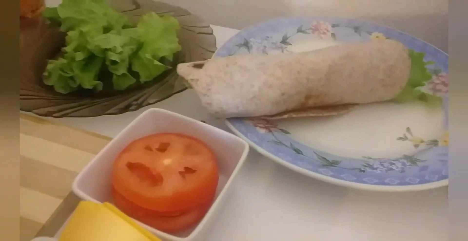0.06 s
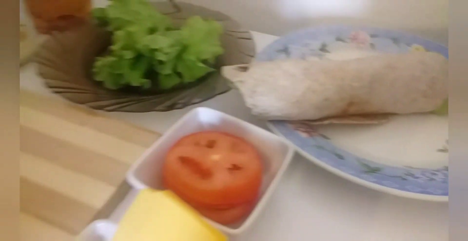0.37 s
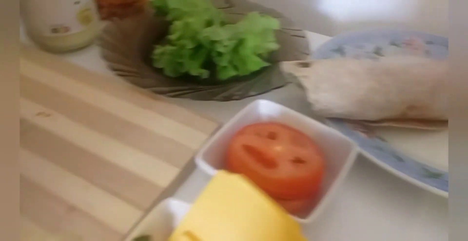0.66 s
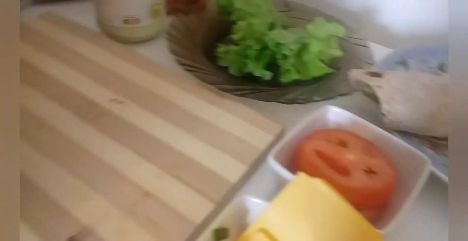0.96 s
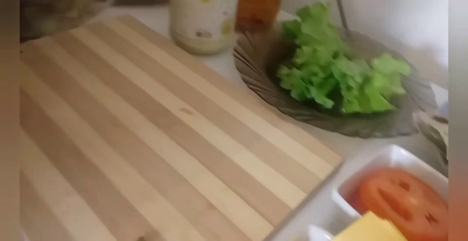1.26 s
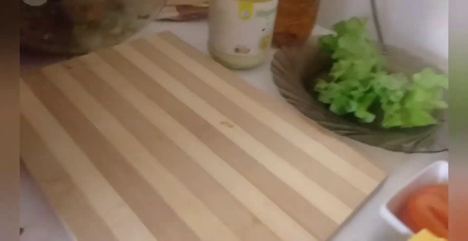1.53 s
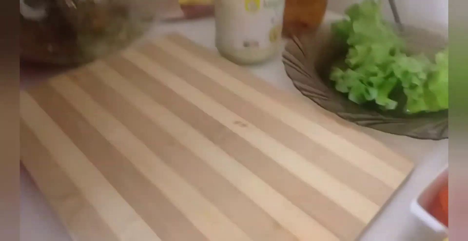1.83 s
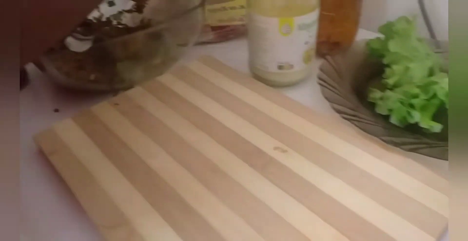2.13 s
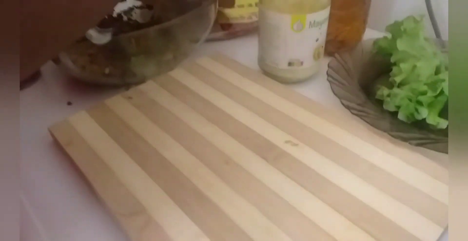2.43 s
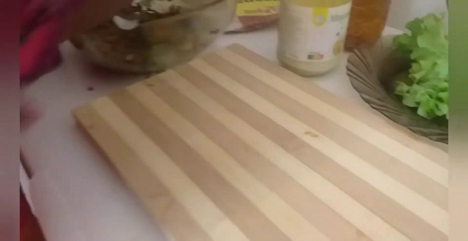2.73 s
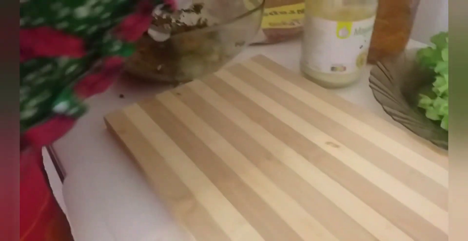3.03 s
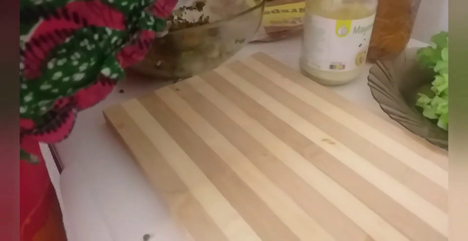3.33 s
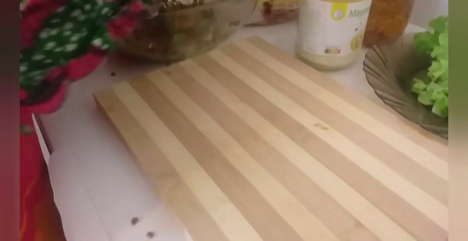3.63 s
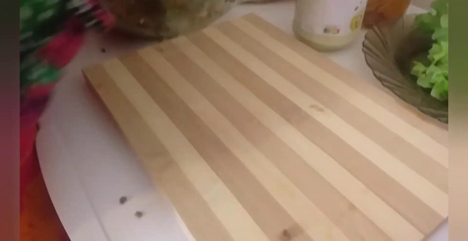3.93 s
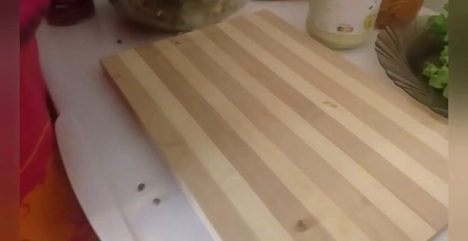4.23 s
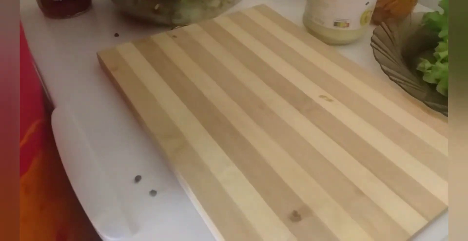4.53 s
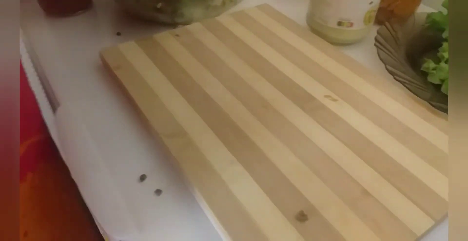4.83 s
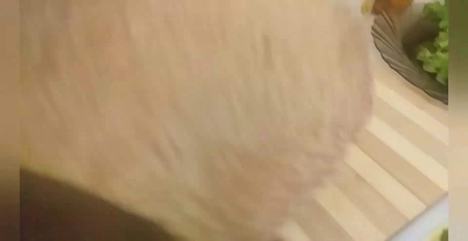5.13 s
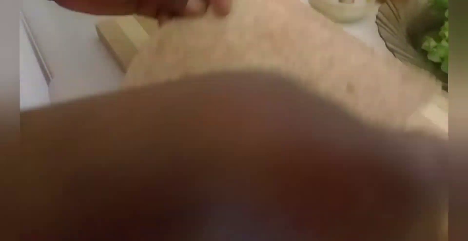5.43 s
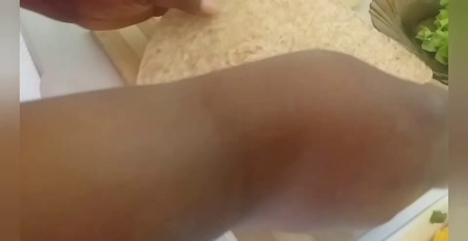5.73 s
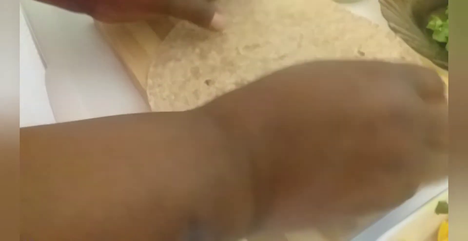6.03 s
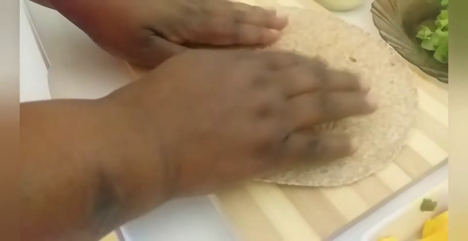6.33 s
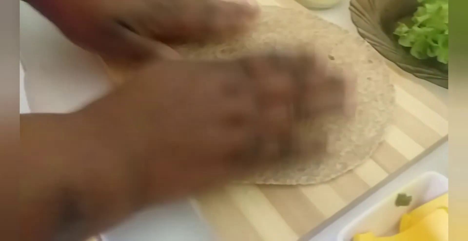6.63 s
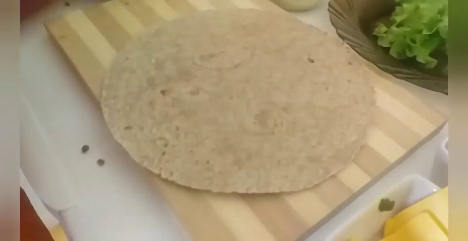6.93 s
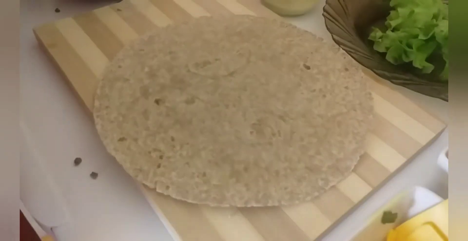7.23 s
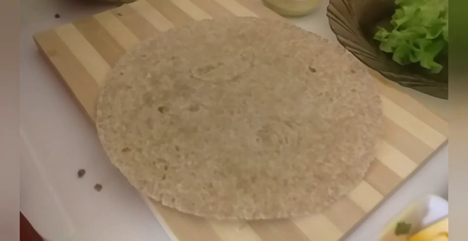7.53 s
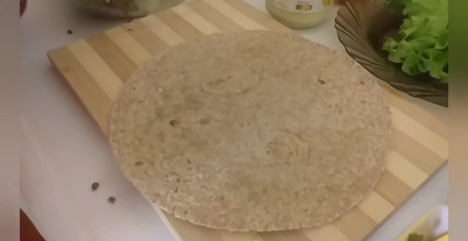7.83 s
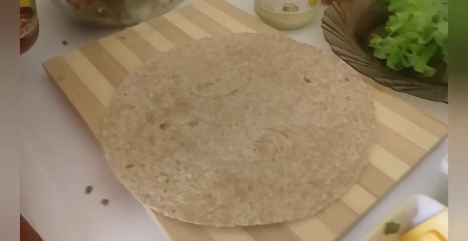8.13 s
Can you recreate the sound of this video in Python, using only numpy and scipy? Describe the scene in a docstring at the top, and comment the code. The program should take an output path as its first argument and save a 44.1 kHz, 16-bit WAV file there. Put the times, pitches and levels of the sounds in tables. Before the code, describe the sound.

Food and dishes are handled on a kitchen table with taps, knocks and faint squeaks; a plate clanks, and hands rustle over a tortilla.

```python
"""Food is laid out on a kitchen table, close to a hand-held phone. First come light taps, a knock,
and fingers bumping the phone. From about 1.6 to 4 s a glass bowl is dragged, scraping and squeaking;
a bamboo board is knocked, hardest at 2.1 s. Cloth and hands rustle, and at 5.5 s a plate lands with
a clank and rings. Last, a tortilla is swept onto the board and patted flat.
Throughout, a small hard room rings over a quiet hum."""
import sys
import numpy as np
from scipy import signal
from scipy.fft import rfft, irfft, next_fast_len
from scipy.io import wavfile

SR = 44100
rng = np.random.default_rng(int(sys.argv[2]) if len(sys.argv) > 2 else 0)


def int16_out(signal):
    """Quantize to a 16-bit WAV file."""
    q = np.round(np.clip(np.atleast_2d(signal).T, -1, 1) * 32767)
    wavfile.write(sys.argv[1], SR, q.astype(np.int16))


N = 361179
TIME_S = np.arange(N) / SR
RING_S = TIME_S[:30000]  # time axis of one decay


def plate(ring_db=1, build_s=0.0043, chatter_t60_s=0.045, crack_db=-27, clack_db=-32):
    """Each rim contact cracks, clacks and starts a quickly damped ring; the settled plate rings on."""
    # Each row: start of a rim contact in seconds, gain in dB.
    rim_hits = [(5.4821, -10), (5.4842, 0), (5.491, -4.5), (5.495, -2), (5.4997, -0.5), (5.51, -9)]
    # Each row: plate mode in Hz, relative level in dB, t60 in seconds.
    modes = [(593, -42, .25), (1050, -37, .27), (1130, -50, .25), (1240, -51, .25), (1340, -48, .28),
             (1432, -50, .3), (1486, -46, .35), (1770, -47, .4), (1801, -38, .29), (1841, -37, .28),
             (2365, -32, .21), (3100, -49, .5), (3192, -36, .47), (3267, -41, .4), (3393, -29, .27),
             (3978, -45, .37), (4161, -44, .3), (4239, -35, .4), (4311, -33, .28), (4619, -45, .3),
             (4973, -30, .37), (5042, -39, .55), (5413, -33, .27), (5566, -44, .5), (5634, -36, .27),
             (5900, -44, .35), (6406, -46, .5), (6821, -45, .44), (7289, -41, .38), (7337, -38, .28)]
    contacts, free_ring = np.zeros((2, N))
    for start_s, db in rim_hits:
        crack = undb(crack_db) * burst(centre_hz=7600, octaves=0.88, t60_s=0.057)
        clack = undb(clack_db) * burst(centre_hz=1400, octaves=0.25, t60_s=0.054)
        chatter = ringing(modes) * fade(chatter_t60_s)
        add(contacts, start_s, undb(db) * (crack + clack + chatter))
    build_up = 1 - np.exp(-RING_S / build_s)
    add(free_ring, rim_hits[0][0], undb(ring_db) * ringing(modes) * build_up)
    return contacts, free_ring


def knocks(thud_octaves=0.82, thud_db=-3, ring_db=-4):
    """A blow clicks, thuds and rings the board and table; the modes nearest the thud's centre ring most."""
    # Each row: start in seconds, thud's relative level in dB, thud centre in Hz, thud t60 in seconds,
    # click level in dB, click centre in Hz, level of the click's crisp edge in dB.
    blows = [(.955, -53.5, 705, 0.097, -39.5, 3360, -60), (1.092, -48.5, 262, 0.085, -46.5, 3400, -68),
             (1.332, -79, 195, .08, -56.5, 2800, -66), (1.753, -55, 244, 0.05, -56, 2900, -54),
             (2.121, -34, 545, 0.1, -35.5, 3000, -42), (2.129, -48, 150, 0.13, -39, 3000, -62),
             (2.148, -37.5, 840, 0.15, -36.5, 5000, -29), (2.157, -43, 595, 0.072, -34.5, 5000, -30),
             (2.278, -44.5, 298, 0.083, -33.5, 1560, -35), (2.601, -53.5, 413, .5, -51.5, 5000, -51),
             (3.573, -53, 696, 0.66, -49, 5540, -51), (4.250, -51, 304, 0.065, -54.5, 4500, -72),
             (4.575, -52.5, 183, 0.16, -72, 2000, -84), (5.487, -48.5, 240, 0.32, -58, 2000, -48),
             (5.689, -51, 230, .33, -40, 5200, -60), (5.712, -48, 810, .096, -61, 1500, -71),
             (6.030, -56.5, 216, 0.12, -50.5, 2440, -56), (6.096, -62.5, 220, 0.058, -57.5, 3570, -57.5),
             (6.699, -57.5, 210, 0.41, -56, 3000, -66), (7.245, -46.5, 130, 0.31, -48, 5000, -56),
             (7.288, -51.5, 242, 0.31, -44.5, 5000, -56), (7.327, -46.5, 175, 0.15, -43.5, 1490, -62),
             (7.366, -56, 500, 0.076, -43, 2300, -54)]
    # Each row: mode of table top and board in Hz, relative level in dB, t60 in seconds.
    table_modes = [(129.2, 8, 0.28), (219, 6.5, 0.038), (266, 7.5, 0.076), (336, 0, 0.082),
                   (400, -2, 0.033), (487, 3.5, 0.023), (600, -4, 0.2), (717, 2.5, 0.031),
                   (1027, 6.5, 0.04), (1140, 9.5, 0.08)]
    thuds, clicks, edges = np.zeros((3, N))
    for start_s, blow_db, thud_hz, thud_t60_s, click_db, click_hz, edge_db in blows:
        reach = bell(thud_hz, thud_octaves)
        ring = ringing([(hz, db + 20 * np.log10(reach(hz)), t60_s) for hz, db, t60_s in table_modes])
        thud = burst(thud_hz, thud_octaves, thud_t60_s)
        add(thuds, start_s, undb(blow_db) * (undb(thud_db) * thud + undb(ring_db) * ring))
        add(clicks, start_s, undb(click_db) * burst(click_hz, octaves=2.02, t60_s=0.073))
        add(edges, start_s, undb(edge_db) * burst(centre_hz=13400, octaves=0.42, t60_s=0.038))
    return thuds, clicks, edges


def bowl(flutter_db=5, pitch_jitter=0.013):
    """Glass scrapes over the table and at times sticks and slips in a thin, unsteady squeak."""
    # Each row: peak time, rise and fall of a push in seconds, level in dB.
    pushes = [(1.86, .25, 0.28, -63), (2.09, 0.33, 0.62, -53), (2.38, 0.33, .25, -58), (3.16, 0.9, .4, -65)]
    # Each row: scrape resonance in Hz, width in Hz, relative level in dB.
    peaks = [(1980, 690, 0.5), (2870, 570, -2), (5630, 3200, -4.5)]
    # One list per squeak. Each row: time in seconds, pitch in Hz, level in dB.
    squeaks = [
        [(2.46, 2520, -73), (2.5, 2445, -63), (2.58, 2444, -62), (2.65, 2380, -56.5), (2.7, 2370, -72),
         (2.75, 2426, -59), (2.86, 2350, -75)],
        [(3.27, 2550, -69), (3.35, 2470, -61), (3.38, 2437, -47), (3.4, 2424, -67), (3.5, 2476, -66),
         (3.56, 2463, -70), (3.9, 2460, -76)],
    ]

    def spectrum(hz):
        return np.sqrt(sum((undb(db) * resonance(centre_hz, width_hz)(hz)) ** 2 / width_hz
                           for centre_hz, width_hz, db in peaks))

    power = sum((undb(db) * swell(peak_s, rise_s, fall_s)) ** 2 for peak_s, rise_s, fall_s, db in pushes)
    out = noise(spectrum) * np.sqrt(power)
    for squeak in squeaks:
        times_s, hz, db = np.transpose(squeak)
        pitch_hz = np.interp(TIME_S, times_s, hz) * (1 + pitch_jitter * drift(rate_hz=300))
        level_db = np.interp(TIME_S, times_s, db, left=-np.inf, right=-np.inf)
        level_db += flutter_db * drift(rate_hz=70)
        out += undb(level_db) * np.sin(2 * np.pi * np.cumsum(pitch_hz) / SR)
    return out


def taps(ticks_per_s=30, scatter_db=3):
    """Food and fingers tap, nudged dishes clink, and handling scatters tiny ticks."""
    # Each row: start in seconds, level in dB, centre in Hz, spread in octaves, t60 in seconds.
    light_taps = [(.036, -54, 4200, 0.79, 0.083), (0.049, -50.5, 4650, 0.88, 0.076),
                  (0.237, -53.5, 2930, 2, 0.089), (0.6358, -48, 4100, 0.77, 0.034),
                  (.637, -53, 14000, 0.52, .1), (.643, -45, 4300, 0.69, 0.094),
                  (.903, -48.5, 2880, 1.55, 0.27), (0.936, -42, 3470, 1.35, 0.04),
                  (.963, -39, 3650, 1.5, 0.029), (1.01, -48, 3200, 1.2, 0.023),
                  (1.133, -42.5, 4260, 0.68, 0.012), (1.182, -46, 4960, 0.45, 0.031),
                  (1.248, -53, 3600, 1.3, 0.037), (2.355, -47, 3500, 1, 0.053),
                  (2.517, -49, 2280, 1.1, 0.07), (2.729, -51, 3500, 1.44, 0.14),
                  (3.674, -53.5, 5500, 1.1, 0.08), (3.924, -57, 3500, 1.8, 0.11),
                  (5.790, -52.5, 5500, 0.64, 0.09), (6.573, -52, 6000, 1.1, .09),
                  (6.697, -49, 5630, 0.27, .04), (7.455, -49, 6000, 1.5, .045),
                  (7.66, -49.5, 5830, 1.3, .044)]
    # Each row: start in seconds, level in dB, pitch in Hz.
    clinks = [(.964, -44.5, 2740), (2.123, -53, 2430), (2.281, -46, 3030), (4.252, -50.5, 4500),
              (7.184, -55, 4220), (7.288, -48, 3700), (7.560, -45.5, 4630), (7.794, -52, 4600)]
    # Each row: start and end of handling in seconds, tick gain in dB.
    handling = [(.91, 1.25, -56.5), (7.18, 7.40, -57)]
    out, impulses = np.zeros((2, N))
    for start_s, db, hz, octaves, t60_s in light_taps:
        add(out, start_s, undb(db) * burst(hz, octaves, t60_s))
    for start_s, db, hz in clinks:
        add(out, start_s, undb(db) * burst(hz, octaves=0.13, t60_s=0.06))
    for start_s, end_s, db in handling:
        fires = (rng.random(N) < ticks_per_s / SR) & (TIME_S > start_s) & (TIME_S < end_s)
        impulses += fires * undb(db + scatter_db * rng.standard_normal(N))
    tick = burst(centre_hz=4300, octaves=1.5, t60_s=0.02)
    return out + signal.fftconvolve(impulses, tick)[:N]


def rustles(surge_db=2.5, grain_db=2):
    """Cloth, hands and tortilla catch and slip in tiny grains: a soft rub, a hiss and a fine sizzle."""
    # Each row: peak time, rise and fall in seconds, then hiss, rub and sizzle levels in dB.
    strokes = [(1.19, 0.4, 0.19, -56, -53.5, -60), (1.41, 0.27, 0.16, -69, -69, -67),
               (2.61, 0.14, 0.11, -57.5, -57, -53), (2.85, 0.41, 0.58, -61, -75, -61),
               (3.62, 0.18, 0.3, -66, -62, -65), (4.04, 0.17, 0.28, -61, -67, -70),
               (4.29, 0.094, 1.3, -64, -72, -71), (4.888, .34, 0.38, -47, -49.5, -48.5),
               (5.20, 0.18, 0.27, -56.5, -64.5, -49.5), (5.44, 0.71, 0.34, -61, -62, -66),
               (5.80, 0.43, 0.11, -55.5, -58, -61), (6.00, 0.089, 0.08, -53, -58, -49.5),
               (6.31, 0.021, 0.13, -57.5, -61, -85), (6.39, 0.13, 0.082, -60, -58, -65),
               (6.79, 0.32, 0.5, -54, -63, -51), (7.02, .4, 0.94, -61.5, -66, -72),
               (7.20, 0.15, 0.37, -59.5, -62, -54), (7.62, 0.71, 1.5, -57.5, -61, -62)]
    grains = unit_rms(undb(surge_db * drift(rate_hz=14) + grain_db * drift(rate_hz=350)))
    rub = noise(band(low_hz=736, high_hz=2610))
    hiss = noise(band(low_hz=3100, high_hz=8760))
    sizzle = noise(band(low_hz=8700, high_hz=17100))
    band_power = sum(np.outer(undb(levels_db), swell(peak_s, rise_s, fall_s)) ** 2
                     for peak_s, rise_s, fall_s, *levels_db in strokes)
    return grains * np.sum(np.sqrt(band_power) * [hiss, rub, sizzle], axis=0)


def phone_touches(push_hz=620, wobble_hz=92, wobble_db=-6):
    """A finger bump is one quick push and a low wobble; a snap is one impulse into the phone's case."""
    # Each row: start in seconds, level of the push in dB.
    bumps = [(1.096, -42.5), (1.5981, -40.5)]
    # Each row: start in seconds, gain in dB.
    snaps = [(0.5188, -24)]
    # Each row: case mode in Hz, relative level in dB, t60 in seconds.
    case_modes = [(330, -51, 0.01), (1600, -10, 0.0011), (5230, 0, 0.0019), (6740, 2.5, 0.0015),
                  (12700, 8.5, 0.0018), (15000, 0, .002)]
    push = np.sin(2 * np.pi * push_hz * RING_S) * (RING_S < 1 / push_hz)
    wobble = np.sin(2 * np.pi * wobble_hz * RING_S) * fade(t60_s=0.075)
    snap = sum(undb(db) * fade(t60_s) * np.sin(2 * np.pi * hz * RING_S) for hz, db, t60_s in case_modes)
    out = np.zeros(N)
    for start_s, db in bumps:
        add(out, start_s, undb(db) * (push + undb(wobble_db) * wobble))
    for start_s, db in snaps:
        add(out, start_s, undb(db) * snap)
    return out


def kitchen(sound, gap_s=0.0066, build_s=0.0031):
    """Dense reflections from hard, near walls; each octave decays at its own rate."""
    # Each row: frequency in Hz, reverberation t60 in seconds.
    decay_times = [(150, 0.64), (600, 0.54), (2500, 0.56), (6000, 0.36), (14000, 0.64)]
    tail = np.zeros(len(RING_S))
    for hz in 125 * 2 ** np.arange(8):
        octave = noise(band(hz / np.sqrt(2), hz * np.sqrt(2)), size=len(RING_S))
        tail += np.sqrt(hz) * octave * fade(along(decay_times, hz))
    tail *= np.clip((RING_S - gap_s) / build_s, 0, 1)
    return signal.fftconvolve(sound, tail / np.linalg.norm(tail))[:N]


def background(floor_db=-62.5, drift_db=-2.1, buzz_db=-71, pulse_hz=48.7):
    """Room rumble and hiss, faint appliance hum and whines, and a high, pulsing electronic buzz."""
    # Each row: frequency in Hz, relative density of the room noise in dB.
    floor_shape = [(30, -3), (54, -0.5), (85, -1.5), (130, -3.5), (180, -0.5), (300, -7), (500, -12),
                   (800, -19.5), (1200, -13), (1600, -20.5), (2500, -12), (3300, -22), (7000, -15.5),
                   (9500, -20), (15500, -18.5)]
    # Each row: centre in Hz, width in Hz, base level in dB.
    whine_peaks = [(128.1, 14, -69), (1193, 130, -75), (3942, 80, -76.5), (4093, 63, -76.5)]
    # Each row: time in seconds, gain of whines and buzz in dB.
    appliance_curve = [(0, 1.5), (.45, 1), (.7, -1), (2.0, -3.5), (3.2, -2.5), (3.5, -0.5), (4.3, -4),
                       (6.3, -3), (8.1, -6)]
    air = undb(floor_db + drift_db * drift(rate_hz=2.5)) * noise(lambda hz: undb(along(floor_shape, hz)))
    whines = sum(undb(db) * noise(resonance(hz, width_hz)) for hz, width_hz, db in whine_peaks)
    pulse = unit_rms(1 + np.sin(2 * np.pi * pulse_hz * TIME_S))
    buzz = undb(buzz_db) * noise(resonance(centre_hz=12500, width_hz=900)) * pulse
    appliance_db = np.interp(TIME_S, *np.transpose(appliance_curve))
    return air + (whines + buzz) * undb(appliance_db)


def burst(centre_hz, octaves, t60_s):
    """Many close, damped modes struck at once."""
    return noise(bell(centre_hz, octaves), size=len(RING_S)) * fade(t60_s)


def ringing(modes):
    """Decaying sines with random phases."""
    return sum(undb(db) * fade(t60_s) * np.sin(2 * np.pi * (hz * RING_S + rng.random()))
               for hz, db, t60_s in modes)


def noise(gain, size=N):
    """Unit-rms noise with spectrum gain(hz)."""
    padded = next_fast_len(size)
    hz = np.maximum(np.fft.rfftfreq(padded, 1 / SR), 1)
    spectrum = rfft(rng.standard_normal(padded)) * gain(hz)
    return unit_rms(irfft(spectrum, padded)[:size])


def bell(centre_hz, octaves):
    """Broad resonance with gentle skirts."""
    return lambda hz: (1 + (np.log2(hz / centre_hz) / octaves) ** 2 / 2) ** -2 / np.sqrt(1 + hz / centre_hz)


def resonance(centre_hz, width_hz):
    """One narrow peak."""
    return lambda hz: 1 / (1 + ((hz - centre_hz) / width_hz * 2) ** 2)


def band(low_hz, high_hz):
    """Pass band with steep edges."""
    return lambda hz: 1 / np.sqrt((1 + (low_hz / hz) ** 8) * (1 + (hz / high_hz) ** 8))


def swell(peak_s, rise_s, fall_s, depth_db=24):
    """Gain of a sliding stroke: up by depth_db over rise_s, down as much over fall_s."""
    distance = np.maximum((peak_s - TIME_S) / rise_s, (TIME_S - peak_s) / fall_s)
    return undb(-depth_db * distance.clip(max=8))


def fade(t60_s):
    """Exponential decay, 60 dB in t60_s."""
    return np.exp(-np.log(1000) * RING_S / t60_s)


def drift(rate_hz):
    """Smooth random drift with a spread near one."""
    return np.interp(TIME_S * rate_hz, np.arange(SR), rng.standard_normal(SR))


def along(points, hz):
    """Interpolate (Hz, value) points on a log-frequency axis."""
    points_hz, values = np.transpose(points)
    return np.interp(np.log(hz), np.log(points_hz), values)


def add(track, start_s, sound):
    """Mix a sound into a track."""
    start = int(start_s * SR)
    track[start:start + len(sound)] += sound[:N - start]


def undb(db):
    """Decibels to gain."""
    return 10 ** (np.asarray(db) / 20)


def unit_rms(x):
    """Scale to an rms of one."""
    return x / np.sqrt(np.mean(x ** 2))


def scene():
    """Table sounds reach the walls, each by its own share; the rest stays dry. Both channels are equal."""
    thuds, clicks, edges = knocks()
    light_contacts = taps() + clicks
    drag = bowl()
    clank, ring = plate()
    direct = light_contacts + edges + thuds + drag + clank + ring
    to_walls = (undb(-3) * light_contacts + undb(-7.5) * edges + undb(-5) * thuds
                + undb(-6) * drag + undb(-7) * clank + undb(-21) * ring)
    mono = direct + kitchen(to_walls) + phone_touches() + rustles() + background()
    return np.array([mono, mono])


def record(dry, top_hz=15900):
    """The phone's microphone dips in the upper treble; the top is cut."""
    # Each row: frequency in Hz, microphone gain in dB.
    response = [(25, -18.5), (55, 1), (1000, -1), (7300, 4.5), (8000, -5.5), (8800, -13), (10000, -7.5),
                (12000, -4.5), (15500, -2)]
    hz = np.maximum(np.fft.rfftfreq(N, 1 / SR), 1)
    cepstrum = irfft(np.log(undb(along(response, hz))), N)
    causal = np.r_[cepstrum[0], 2 * cepstrum[1:N // 2]]  # minimum phase: no ringing ahead of a click
    coloured = irfft(rfft(dry) * np.exp(rfft(causal, N)), N)
    lowpass = signal.ellip(10, 0.2, 70, top_hz, fs=SR, output="sos")
    return signal.sosfilt(lowpass, coloured)


dry = scene()
out = record(dry)
int16_out(out)
```